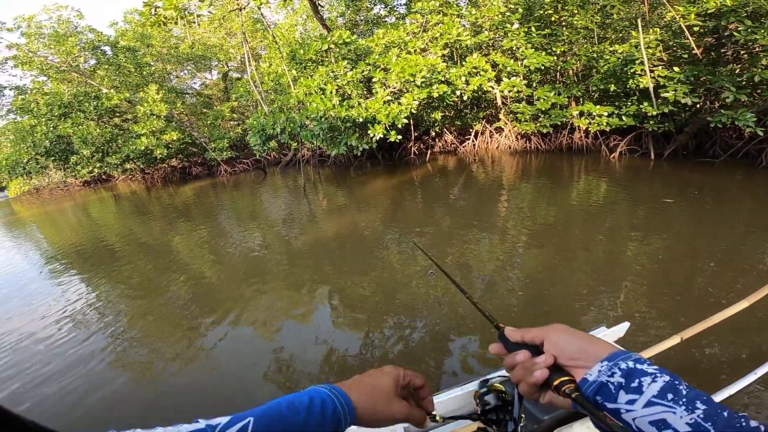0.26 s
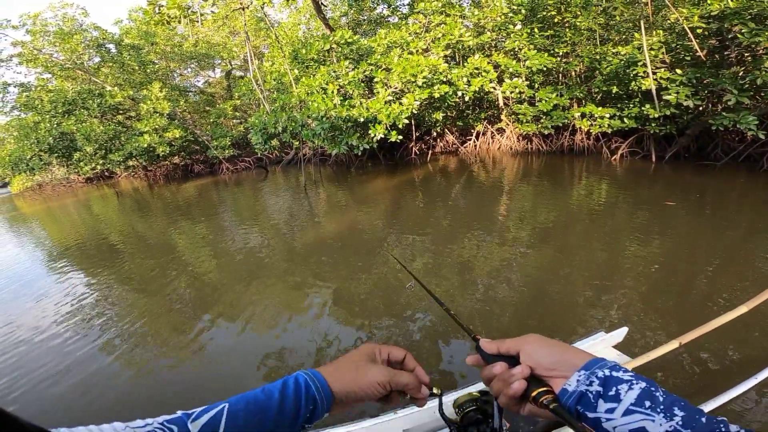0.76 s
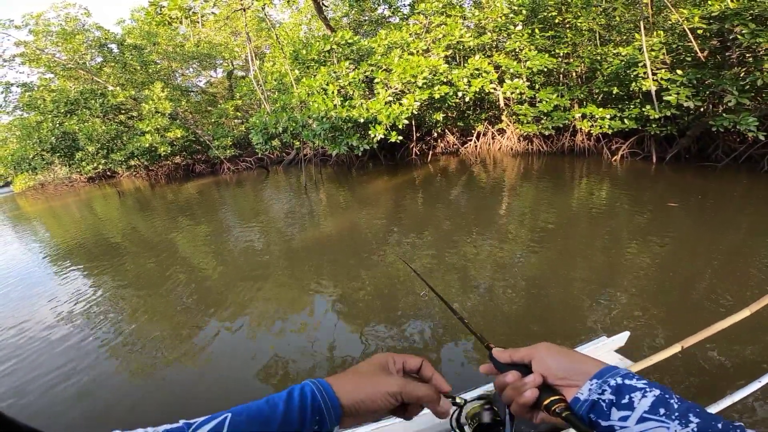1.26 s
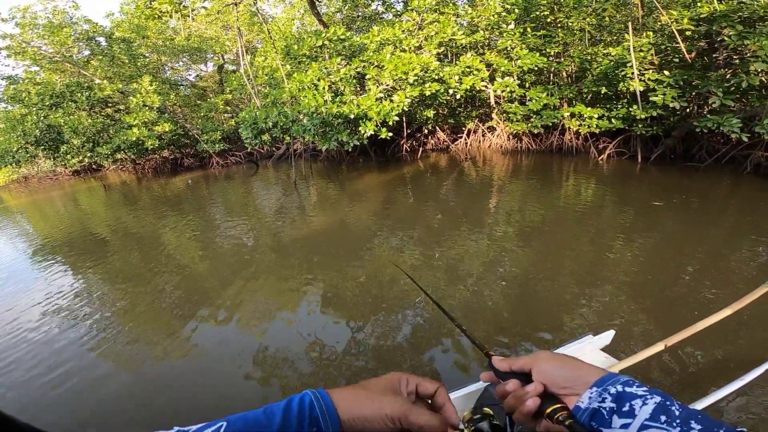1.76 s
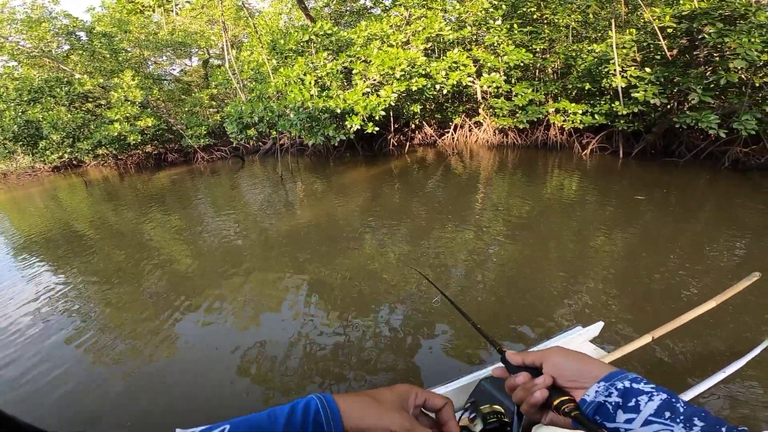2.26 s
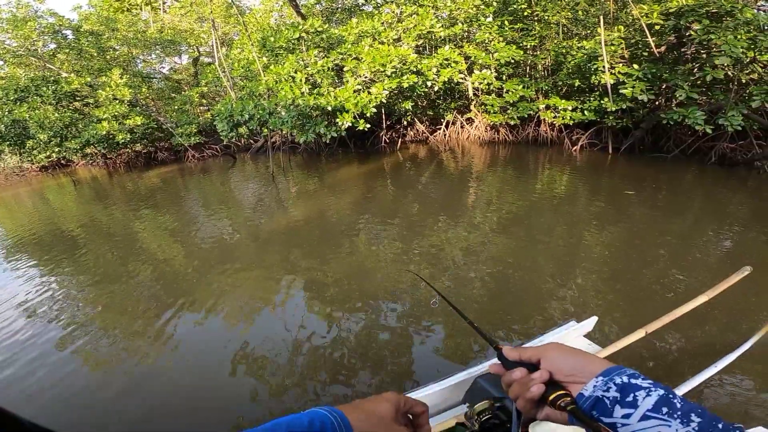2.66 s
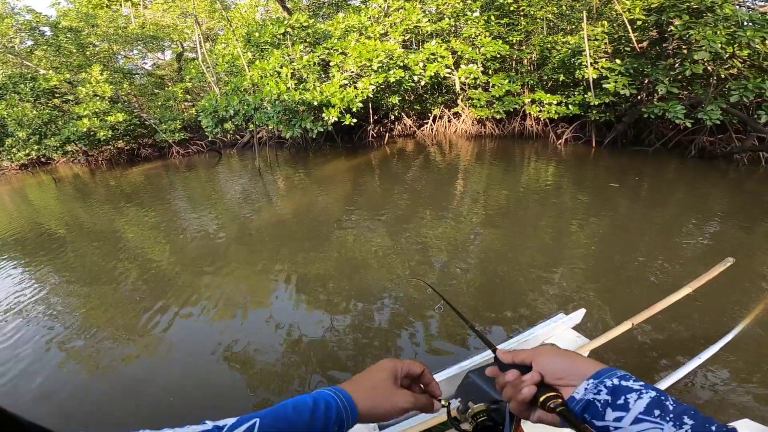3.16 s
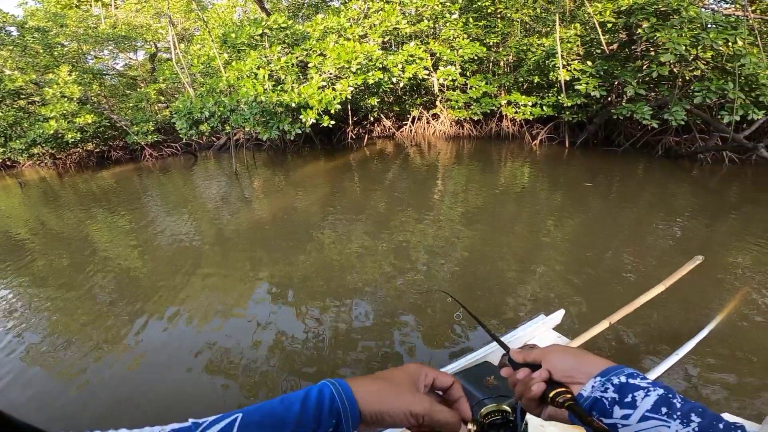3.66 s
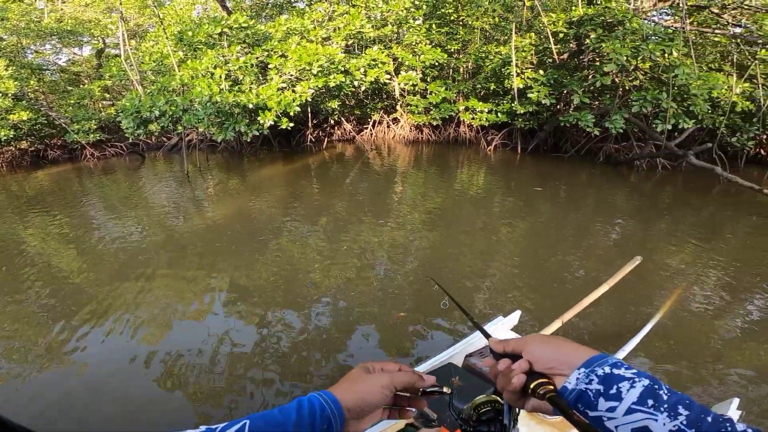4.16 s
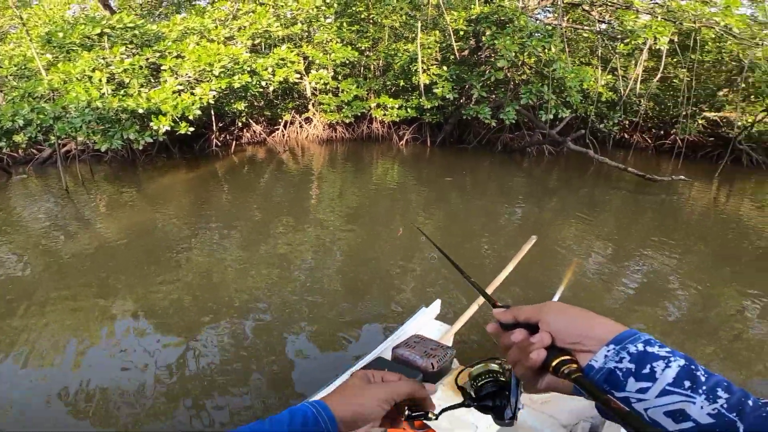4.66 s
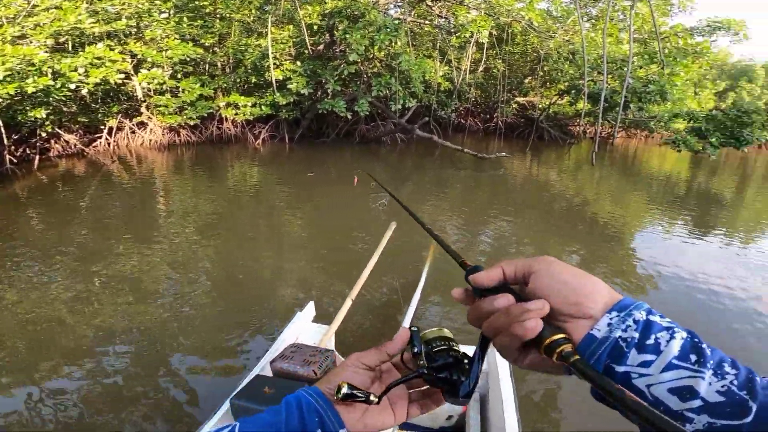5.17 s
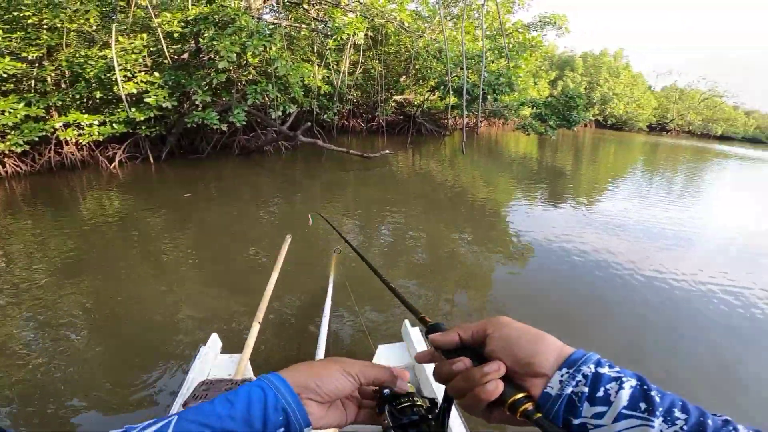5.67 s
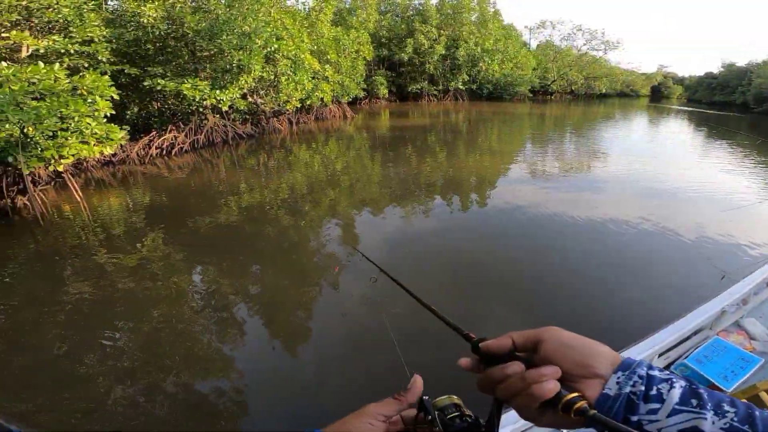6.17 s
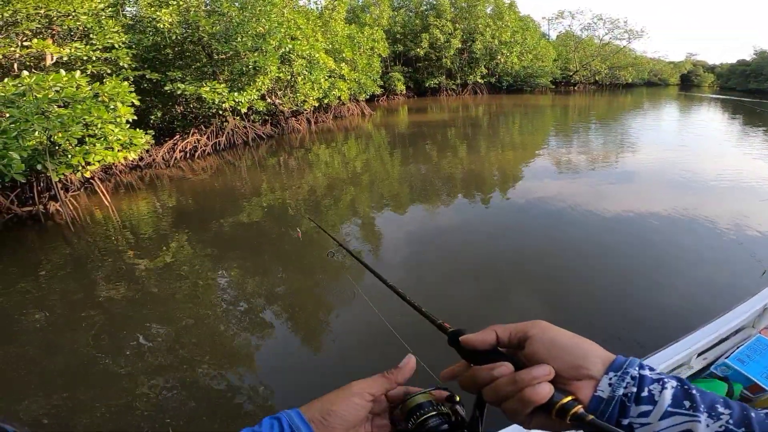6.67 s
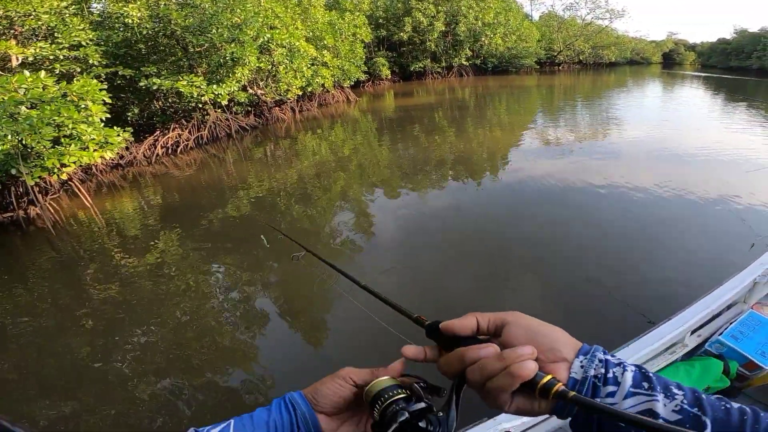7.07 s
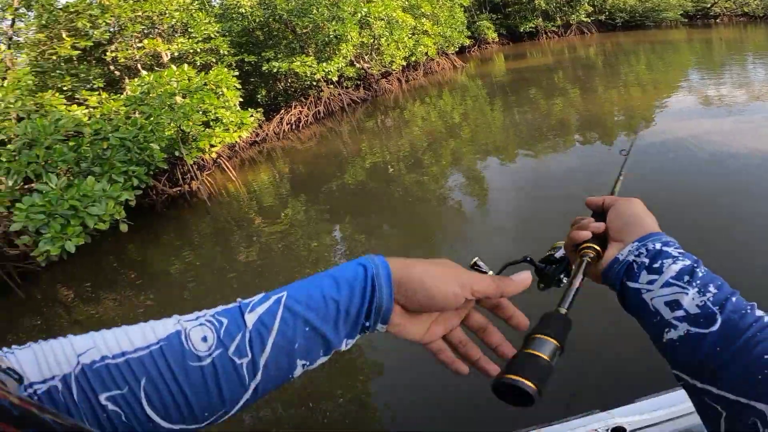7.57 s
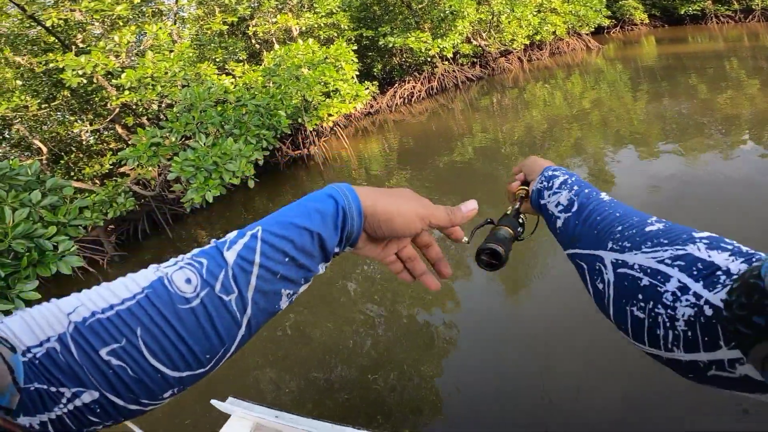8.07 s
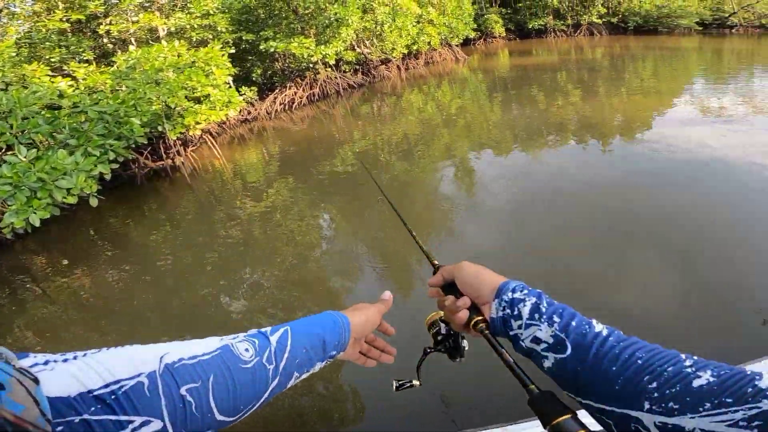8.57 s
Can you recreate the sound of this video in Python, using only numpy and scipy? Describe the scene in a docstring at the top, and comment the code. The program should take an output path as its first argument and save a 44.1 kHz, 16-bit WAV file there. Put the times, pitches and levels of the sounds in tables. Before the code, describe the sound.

A steady cicada hiss throbs in mangroves, then a near cicada pulses loudly, while fishing reel clicks, hull knocks and water laps sound close by.

```python
"""Cicadas around a small boat

A far cicada chorus throbs in the mangroves, then a near cicada chirps loudly: tymbal snaps ring coloured
bodies. Fainter insects are bands of noise; a distant bird whistles steady, quavering tones through the echoing
trees. An angler's reel clicks and whirrs, gear strikes ring the modes of rod and hull, and friction hisses and
squeaks. Shaped noise makes lapping water, leaf hiss, rumble, a murmur and breeze at the microphone; sines make
a low drone."""
import sys
import numpy as np
from scipy import signal
from scipy.fft import rfft, irfft, next_fast_len
from scipy.io import wavfile
from scipy.ndimage import uniform_filter1d

SR = 44100
rng = np.random.default_rng(int(sys.argv[2]) if len(sys.argv) > 2 else 0)


def output_pcm(signal):
    """Save a mono or channel-first signal as 16-bit PCM at the path in sys.argv[1].

    Samples are clipped to [-1, 1] before scaling.
    """
    pcm = np.clip(np.atleast_2d(signal).T, -1, 1) * 32767
    wavfile.write(sys.argv[1], SR, np.round(pcm).astype(np.int16))


N = 389403
TIME = np.arange(N) / SR

# lead of the left microphone port over the right; negative means that the right leads
CHORUS_LEAD_US, CICADA_LEAD_US, GEAR_LEAD_US, LEAVES_LEAD_US = -38.5, 29, 45, 28.3


def from_db(db):
    """Logarithmic level: 20 dB is a factor of ten in amplitude."""
    return 10 ** (np.asarray(db) / 20)


def rms_one(x):
    """Normalisation: scale to unit mean power."""
    return x / np.sqrt(np.mean(x ** 2) + 1e-20)


def in_time(rows):
    """Linear interpolation: each column of a curve at every sample."""
    s, *columns = np.transpose(rows)
    return [np.interp(TIME, s, c) for c in columns]


def drift(rate):
    """Low-pass random process: white noise through two equal poles wanders smoothly with spread 1."""
    r = np.exp(-80 * np.pi * rate / SR)
    # computed at every 40th sample; the first 2000 values let the filter settle
    white = rng.standard_normal(N // 40 + 2002)
    slow = signal.lfilter([1], [1, -2 * r, r * r], white)[2000:]
    return np.interp(np.arange(N) / 40, np.arange(len(slow)), rms_one(slow))


def stereo_noise(alike):
    """Interchannel coherence: mid and side white noise mix to a given left-right correlation."""
    mid, side = rng.standard_normal((2, N))
    alike = np.clip(alike, -1, 1)
    common = np.sqrt(1 + alike) * mid
    opposed = np.sqrt(1 - alike) * side * [[1], [-1]]
    return (common + opposed) / np.sqrt(2)


def colour(x, points):
    """Minimum-phase filtering: a causal response follows a spectrum and falls beyond its ends; unit power."""
    size = 2 * next_fast_len(N // 2 + 4096)
    octave = np.log2(np.maximum(np.arange(size // 2 + 1) * SR / size, 1))
    hz, db = np.transpose(points)
    beyond = np.abs(octave - np.clip(octave, np.log2(hz[0]), np.log2(hz[-1])))
    # 18 dB per octave outside the listed range, for at most two octaves
    gain_db = np.interp(octave, np.log2(hz), db) - 18 * np.minimum(beyond, 2)
    # folding the cepstrum onto positive times makes the filter causal
    cepstrum = irfft(np.log(from_db(gain_db)))
    cepstrum[1:size // 2] *= 2
    cepstrum[size // 2 + 1:] = 0
    response = np.exp(rfft(cepstrum))
    return rms_one(irfft(rfft(x, size) * response)[..., :N])


def band(x, low_hz, high_hz, order=2):
    """Butterworth band-pass: a maximally flat pass band."""
    edges = [low_hz, min(high_hz, SR / 2 - 1)]
    return signal.sosfilt(signal.butter(order, edges, "band", fs=SR, output="sos"), x)


def add(out, s, sound):
    """Superposition: mix a short sound in at a time."""
    start = int(s * SR)
    out[:, start:start + sound.shape[-1]] += sound[..., :N - start]


def scatter(x, t60):
    """Diffuse scattering: countless small decaying echoes, different for each side."""
    t = TIME[:SR // 2]
    echoes = rng.standard_normal((2, len(t))) * from_db(-60 * t / t60)
    echoes /= np.sqrt(np.sum(echoes ** 2, axis=1, keepdims=True))
    return signal.fftconvolve(np.atleast_2d(x), echoes, axes=1)[:, :N]


def ports(x, lead_us):
    """Interaural-like delay: one microphone port leads; the phase gap stops growing above 6800 Hz."""
    size = next_fast_len(N + 64)
    hz = np.minimum(np.arange(size // 2 + 1) * SR / size, 6800)
    turn = np.pi * hz * lead_us / 1e6   # each side takes half of the lead
    return irfft(rfft(x, size) * np.exp(1j * turn * np.array([[1], [-1]])), size)[:, :N]


def stroke(start, length, attack_s, t60):
    """Envelope of one movement: it rises up to its start, holds for its length and decays exponentially."""
    attack = np.clip((TIME - start) / attack_s + 1, 0, 1)
    return attack * from_db(-60 * np.clip((TIME - start - length) / t60, 0, 2))


def blurred_tone(hz, width_hz):
    """Narrow-band noise: slow random quadrature amplitudes shake a carrier's strength and phase; unit power."""
    smooth = signal.butter(2, np.clip(width_hz, 5, 2000), fs=SR, output="sos")
    a, b = signal.sosfilt(smooth, rng.standard_normal((2, len(hz) + SR // 10)))[:, SR // 10:]
    phase = 2 * np.pi * np.cumsum(hz) / SR
    return rms_one(a * np.cos(phase) + b * np.sin(phase))


# two tymbals each buckle in and spring out once a cycle: cycle_share (0 to 1), level_db
TYMBAL = [(.02, 0), (.21, -.5), (.58, .3), (.77, 0)]


def tymbal_clicks(rate_hz, wander, uneven_db):
    """Snap-through buckling: four impulses to a muscle cycle, each with a strength of its own."""
    cycles = np.cumsum(rate_hz * (1 + wander * drift(8))) / SR
    clicks = np.zeros(N)
    for share, db in TYMBAL:
        clicks += np.diff(np.floor(cycles - share), prepend=-1) * from_db(db)
    return clicks * from_db(uneven_db * rng.standard_normal(N))


def rib_rattle(clicks, ring_s, alike):
    """Impulsive excitation: each snap sets off a short decaying crackle, as of a tymbal's ribs; unit power."""
    r = np.exp(-1 / (ring_s * SR))
    envelope = signal.lfilter([1], [1, -r], clicks + 1e-18)
    return rms_one(envelope * stereo_noise(alike))


# level and balance of the far chorus: time_s, level_db, left_over_right_db
CHORUS = [(0, -45.5, -3.5), (3.3, -46.5, -3.5), (4.6, -44.5, -2.5), (5.2, -45, 0.5), (5.68, -43.5, 1),
          (5.85, -50, 0.5), (6.1, -52, 2), (6.3, -45, 2), (8.83, -41.5, 3)]
# peak swing of the throb about the level; a negative one swaps peaks and dips: time_s, depth_db
THROB = [(0, 1.8), (1.7, 1.1), (3.2, .5), (4.6, 2), (6.3, 0.8), (8.83, -2.5)]
# cicada body resonances heard from afar: frequency_hz, relative_density_db_per_hz
FAR_BODY = [(4000, -49), (4750, -22), (5250, -5.5), (5750, -5), (6200, 1), (6500, -2.5), (6900, -9),
            (7700, -13.5), (8100, -21), (9200, -27.5), (10500, -38.5), (12200, -25.5), (13200, -57)]
THROB_HZ, FIRST_THROB_S = 8.4, .067


def far_chorus():
    """Amplitude modulation: distance smears most snaps into a hiss that throbs about eight times a second."""
    level_db, pan_db = in_time(CHORUS)
    (depth_db,) = in_time(THROB)
    clicks = tymbal_clicks(107, wander=.015, uneven_db=3)
    snaps = rib_rattle(clicks, ring_s=.0006, alike=.5)
    song = colour(stereo_noise(alike=0.33) + .5 * snaps, FAR_BODY)
    throb_db = depth_db * np.cos(2 * np.pi * THROB_HZ * (TIME - FIRST_THROB_S)) + 0.14 * drift(28)
    return ports(song, CHORUS_LEAD_US) * from_db(level_db + throb_db + pan_db * [[.5], [-.5]])


# level of a thin insect trill, before its waver: time_s, level_db
TRILL = [(0, -67), (1, -69), (2.3, -66), (3.5, -70), (4.5, -78), (5.5, -82.5), (8.83, -86)]
TRILL_HZ, TRILL_WIDTH_HZ = 2564, 480
# level of the high hiss of small insects in the leaves: time_s, level_db
SIZZLE = [(0, -71.5), (4, -74), (5.3, -64), (5.9, -70.5), (6.3, -62.5), (7.6, -61.5), (8.3, -56.5),
          (8.83, -54.5)]
# spectrum of that hiss: frequency_hz, relative_density_db_per_hz
SIZZLE_COLOUR = [(7000, -19), (8500, 7.5), (10500, -1), (12200, 7), (13200, -4.5)]


def small_insects():
    """Spectral niches: fainter insects hold a narrow noise band below the cicadas and a hiss reaching above."""
    (trill_db,), (sizzle_db,) = in_time(TRILL), in_time(SIZZLE)
    low_hz, high_hz = TRILL_HZ - TRILL_WIDTH_HZ / 2, TRILL_HZ + TRILL_WIDTH_HZ / 2
    trill = rms_one(band(stereo_noise(alike=0.48), low_hz, high_hz))
    waver_db = 2.5 * drift(10)
    trill = ports(trill, LEAVES_LEAD_US) * from_db(trill_db + waver_db)
    sizzle = colour(stereo_noise(alike=-0.061), SIZZLE_COLOUR) * from_db(sizzle_db)
    return trill + sizzle


# spectrum of the low rumble: frequency_hz, relative_density_db_per_hz
RUMBLE = [(15, -7.5), (32, 5), (55, 4.5), (85, 4), (140, -3.5), (200, -8.5), (280, -17), (450, -31.5),
          (900, -52)]
# level of the low rumble, before its drift: time_s, level_db
RUMBLE_LEVEL = [(0, -46.5), (1.2, -46), (2.2, -48), (3.3, -45), (4.4, -47), (5.35, -44), (5.85, -52.5),
                (6.15, -52), (6.4, -45.5), (8.83, -47.5)]
# spectrum of the leaf hiss: frequency_hz, relative_density_db_per_hz
LEAVES = [(200, 8.5), (500, 0), (900, -3.5), (1700, 0), (2800, -4), (4200, -1.5), (8000, -10), (13000, -42)]
# level of the leaf hiss, before its drift: time_s, level_db
LEAF_LEVEL = [(0, -64.5), (3.6, -62.5), (4.4, -70), (4.6, -65), (5.1, -63), (5.9, -70.5), (7.1, -64.5),
              (7.35, -58.5), (8.1, -63.5), (8.3, -58), (8.5, -64), (8.83, -65)]
# peak amplitude of the drone's lower tone at each port, 3 dB below that heard: time_s, level_db
DRONE = [(0, -38.5), (.5, -50), (1.3, -41.5), (2.6, -43), (4.4, -57.5), (8.83, -57.5)]
DRONE_HZ, HUM_HZ = 59.3, 100
HUM_DB = -53.5   # like the drone's, raised by 3 dB in the sum


def open_air():
    """Broadband and tonal background: shaped noise rumbles and hisses under a wavering two-tone drone."""
    (rumble_db,), (leaves_db,), (drone_db,) = in_time(RUMBLE_LEVEL), in_time(LEAF_LEVEL), in_time(DRONE)
    rumble = colour(stereo_noise(alike=0.93), RUMBLE) * from_db(rumble_db + 1.8 * drift(5))
    rustle_db = .8 * drift(12)
    leaves = ports(colour(stereo_noise(alike=0.24), LEAVES), LEAVES_LEAD_US) * from_db(leaves_db + rustle_db)
    drone_phase = 2 * np.pi * np.cumsum(DRONE_HZ + .7 * drift(3)) / SR
    drone = np.sin(drone_phase) * from_db(drone_db + 1.5 * drift(4))
    hum_phase = 2 * np.pi * np.cumsum(HUM_HZ + .6 * drift(3)) / SR
    hum = np.sin(hum_phase) * from_db(HUM_DB + 1.2 * drift(3))
    return rumble + leaves + np.sqrt(2) * (drone + hum)   # root two turns peak into rms level


# level of a hollow low murmur, before its drift: time_s, level_db
MURMUR = [(0, -50), (2.8, -70.5), (3.4, -53), (4.5, -53), (5.4, -53), (5.8, -74), (8.83, -50)]


def murmur(low_hz=120, high_hz=190):
    """Band-limited noise: less than an octave of low noise sounds hollow as it swells and fades."""
    (level_db,) = in_time(MURMUR)
    hollow = rms_one(band(stereo_noise(alike=0.93), low_hz, high_hz))
    return hollow * from_db(level_db + 0.68 * drift(7.5))


# puffs of breeze on the left port, as bell curves: middle_s, level_db, standard_deviation_s
PUFFS = [(1.79, -26.5, 0.01), (1.966, -29, 0.011), (2.219, -18.5, 0.0085), (2.25, -23.5, 0.011),
         (2.5, -20, 0.0073), (2.545, -27, 0.01), (2.577, -21, 0.0096), (2.694, -33.5, 0.24),
         (2.92, -33, 0.022), (3.048, -33, 0.023), (3.343, -33, 0.044)]


def breeze(right_db=-14):
    """Turbulent pressure: eddies thump on the left port, weakly on the right; a slow flutter stays on both."""
    push = sum(from_db(db) * np.exp(-.5 * ((TIME - s) / length) ** 2) for s, db, length in PUFFS)
    eddy_colour = [(20, 6.0), (55, 14.5), (130, 0.5), (220, -13.0), (400, -42.5)]
    eddies = colour(stereo_noise(alike=0.17), eddy_colour)
    # the push alone sets a puff's strength
    eddies /= np.sqrt(uniform_filter1d(eddies ** 2, size=SR // 40) + 1e-9)
    flutter = colour(stereo_noise(alike=0.08), [(12, -13.0), (28, 7.0), (60, -16)])
    flutter *= from_db(-68.0 + 4.9 * drift(1.6))
    return eddies * push * from_db([[0], [right_db]]) + flutter


# spells of turning the reel: start_s, length_s, gear_whirr_db, line_swish_db
TURNS = [(0, .14, -61, -65), (0.436, 0.14, -82, -53.5), (3.915, 0.17, -58.5, -61.5),
         (4.19, 0.011, -53, -70)]
# resonances of the reel's gears and housing: frequency_hz, relative_density_db_per_hz
GEAR_COLOUR = [(800, -7), (1000, 4), (1200, -3.5), (1500, 6.5), (1650, 0), (1800, 10), (2200, -3),
               (2560, 11.5), (3200, -6.5), (4500, 2)]
# spectrum of line running onto the spool: frequency_hz, relative_density_db_per_hz
LINE_COLOUR = [(1500, -14.5), (2400, -3), (3100, 2), (3800, 1), (4800, -9)]
TURN_ATTACK_S, TURN_T60_S = 0.021, 0.48


def winding():
    """Resonant filtering of friction: gears whirr in the reel's housing and line swishes onto the spool."""
    gear, line = np.zeros((2, N))
    for s, length, gear_db, line_db in TURNS:
        turn = stroke(s, length, TURN_ATTACK_S, TURN_T60_S)
        gear += from_db(gear_db) * turn
        line += from_db(line_db) * turn
    whirr = colour(stereo_noise(alike=0.75), GEAR_COLOUR) * gear * from_db(2 * drift(60))
    swish = colour(stereo_noise(alike=0.99), LINE_COLOUR) * line * from_db(1.3 * drift(51))
    return whirr + swish


# ripples reach the hull: crest_s, level_db (before its drift)
LAPS = [(0.1, -69), (1.05, -58), (3.25, -56.5), (4.4, -60.5), (5.35, -54.5), (6.37, -51.5), (7.3, -61.5),
        (8.35, -52), (8.75, -48.5)]
# spectrum of the slop: frequency_hz, relative_density_db_per_hz
LAP_COLOUR = [(130, -9.5), (230, -0.5), (380, -2), (500, -7.5), (700, -22.5), (1200, -22.5)]
LAP_RISE_DB_PER_S, LAP_FALL_DB_PER_S = 56.5, 40


def water():
    """Exponential growth and decay: ripples slop on the hull, swell quickly and drain more slowly."""
    slop = np.zeros(N)
    for crest_s, db in LAPS:
        below_db = np.maximum(LAP_RISE_DB_PER_S * (crest_s - TIME), LAP_FALL_DB_PER_S * (TIME - crest_s))
        slop += from_db(db - below_db)
    return colour(stereo_noise(alike=0.88), LAP_COLOUR) * slop * from_db(2.0 * drift(17))


def strike(blows, body, crack_db, rattle, echo_db):
    """Modal excitation: a push and brief rattle ring a body's modes; blows on stiff parts leave low ones still."""
    out, t = np.zeros((2, N)), TIME[:SR // 3]
    hz, mode_db, t60 = np.transpose(body)[:, :, None]
    for s, db, lowest_hz, bright_db, contact_t60 in blows:
        tilt_db = bright_db * np.log2(hz / 600)
        strength = from_db(mode_db + tilt_db + rng.normal(0, 1, hz.shape))
        strength /= np.sqrt(1 + (lowest_hz / hz) ** 20)
        strength *= rng.choice([-1, 1], hz.shape)
        modes = np.sum(strength * np.sin(2 * np.pi * hz * t) * from_db(-60 * t / t60), axis=0)
        dying = from_db(-60 * t / contact_t60)
        # one push, then sparse random contacts
        force = rattle * rng.standard_normal(len(t)) * (rng.random(len(t)) < .2) * dying
        force[0] = 1
        ring = signal.fftconvolve(force, modes)[:len(t)]
        ring /= np.std(ring[:SR // 50])   # unit level over the first 20 ms
        crack = rms_one(band(rng.standard_normal(len(t)), lowest_hz, 750, order=1))
        crack *= from_db(crack_db) * dying
        add(out, s, from_db(db - 3.5) * band(ring + crack, lowest_hz * 0.84, 5600, order=3))
    return out + from_db(echo_db) * scatter(band(out, 590, 5900), t60=0.32)


# knocks on the hull, t60 being that of the rattling contact:
# start_s, level_db (3.5 above the ring's), lowest_ringing_hz, brightness_db_per_octave, contact_t60_s
KNOCKS = [(.188, -53, 280, -9, 0.055), (7.649, -28.5, 151, -3.5, 0.14), (7.793, -26.5, 150, -0.5, 0.12),
          (7.995, -43.5, 260, -3.5, 0.2), (8.351, -43.5, 404, -13, 0.04), (8.569, -43.5, 524, -20, 0.04),
          (8.727, -25.5, 159, 1.5, 0.078), (8.738, -36.5, 171, -2, 0.047)]
# hull modes: frequency_hz, relative_level_db, t60_s
HULL = [(166, -16, .12), (207, -3.5, 0.2), (300.2, 6.5, 0.14), (330, 2, .13), (406, -1.5, 0.12),
        (450, -6, 0.042), (491, 2.5, 0.05), (583, -3, 0.059), (750, 0.5, 0.04), (850, -3, 0.027),
        (943, -4.5, 0.086), (1033, 1, 0.062), (1250, -11, 0.061), (1480, -15, .035), (2230, 0, .018),
        (2980, -7, .039), (3830, -0.5, 0.0048)]
# bumps of the rod and reel, with the same columns as the knocks:
# start_s, level_db (3.5 above the ring's), lowest_ringing_hz, brightness_db_per_octave, contact_t60_s
BUMPS = [(1.082, -38.5, 196, 0.5, .1), (1.996, -31.5, 590, -6, 0.041), (2.008, -43, 650, 0, 0.049),
         (2.04, -47.5, 600, -10, 0.082), (4.566, -46.5, 700, -6, 0.034), (4.581, -40.5, 160, 3.5, 0.058),
         (4.593, -37, 161, 3, .03), (4.598, -42.5, 300, 5.5, 0.06), (5.12, -44, 150, -9, 0.27),
         (5.152, -44.5, 149, -7, 0.2), (5.361, -37, 154, 2, 0.097), (7.396, -53, 536, -10, .054)]
# rod and reel frame modes: frequency_hz, relative_level_db, t60_s
ROD = [(174, 1.5, 0.2), (232, 0, 0.19), (306, -1, 0.062), (627, -4.5, 0.059), (710, -5.5, 0.049),
       (990, -7, 0.023), (1150, 0.5, 0.019), (1310, -9, 0.035), (1385, -4, 0.052), (1464, -3.5, 0.05),
       (1610, -5, 0.034), (2050, -6.5, 0.021), (2950, -9, .013), (3740, -20, .008)]


def knocks():
    """Modes of two bodies: hollow knocks on the hull and harder, brighter bumps of the rod."""
    hull = strike(KNOCKS, HULL, crack_db=-5, rattle=0.11, echo_db=-13)
    rod = strike(BUMPS, ROD, crack_db=-1.0, rattle=0.22, echo_db=-7.0)
    return hull + rod


# reel and rod clicks:
# start_s, level_db (2 above the direct sound's), centre_hz, t60_s, ring_over_crack_db, left_over_right_db
CLICKS = [(0.23, -50.5, 2000, 0.053, -2, -2), (.621, -53.5, 2070, .035, 3, 0),
          (1.083, -37.5, 3260, 0.049, -0.5, -3), (1.935, -43, 4500, 0.021, 10, 4),
          (1.937, -46.5, 3180, 0.045, 3, 4), (2.131, -56.5, 2580, .05, 7, -6),
          (2.404, -50, 2230, 0.052, -2, -3), (2.453, -52.5, 1344, 0.087, 0, -1),
          (2.795, -42, 3550, 0.091, -1.5, -5), (2.796, -60, 1025, 0.18, 6, -4),
          (2.91, -52, 3280, 0.086, -3, -6), (3.043, -43.5, 3980, 0.077, 4.5, -4),
          (3.21, -47.5, 4190, 0.053, -12, -4), (3.389, -47, 4850, 0.093, -1, -4),
          (3.617, -52.5, 1970, 0.15, -8, -4), (4.501, -51.5, 1510, .03, 6, 2),
          (4.506, -52, 2100, 0.031, 6, 2), (4.513, -48, 1490, 0.057, 3.5, 1),
          (4.524, -48, 2290, .03, -9, 4), (4.613, -53, 1450, .035, 0, 0), (4.624, -57, 2170, 0.08, 8, 0),
          (4.641, -54, 1500, 0.045, 3.5, 0), (4.783, -56, 1990, 0.054, -15, 0),
          (6.031, -36.5, 3530, 0.043, -1.5, -4), (6.03, -39, 8880, 0.029, 4.5, 6),
          (6.076, -51, 3280, 0.18, -12, -2), (6.819, -46, 2620, 0.013, 2, -2),
          (7.288, -56.5, 2620, 0.045, 12, -2), (7.3935, -25, 2730, 0.026, -2.5, -1),
          (7.3954, -18.5, 4070, 0.011, -16, 0), (8.242, -51.5, 3620, 0.039, 6.5, -7),
          (8.324, -43.5, 3620, 0.12, -12, -2), (8.36, -43, 3400, 0.073, -21, -2)]


def reel(spread=2.2, ring_width_hz=130, housing_db=-14, echo_db=-18):
    """Impact and resonance: hard parts crack, ring roughly at the part's own pitch, and the housing answers."""
    out, t = np.zeros((2, N)), TIME[:SR // 5]
    noise = band(stereo_noise(alike=0.98), 670, 6100)
    contact = np.minimum(t / .001, 1)   # the force builds up in 1 ms
    for s, db, hz, t60, ring_db, pan_db in CLICKS:
        piece = noise[:, int(s * SR):][:, :len(t)]
        crack = rms_one(band(piece, hz / spread, hz * spread, order=1))
        ring = from_db(ring_db) * blurred_tone(np.full(len(t), hz), ring_width_hz)
        decay = from_db(db - 60 * t / t60 + pan_db * np.array([[.5], [-.5]]))
        add(out, s, (crack + ring) * contact * decay)
    housing = from_db(housing_db) * np.std(out) * colour(out, GEAR_COLOUR)
    return from_db(-2.0) * (out + housing) + from_db(echo_db) * scatter(out, t60=0.12)


# sleeve and fingers rub on the rod: start_s, length_s, level_db (before its drift)
RUBS = [(1.107, 0.028, -55), (1.94, 0.045, -51.5), (4.505, 0.15, -54), (4.764, 0.048, -60),
        (5.114, 0.12, -64), (5.362, 0.019, -56.5), (8.234, 0.071, -57.5), (8.672, 0.027, -56)]
# spectrum of the rubbing: frequency_hz, relative_density_db_per_hz
RUB_COLOUR = [(300, 2.5), (700, -1.5), (1400, 3.5), (2500, 4), (4500, 3), (9000, -8)]
RUB_ATTACK_S, RUB_T60_S = 0.018, 0.98
CRACKLES_PER_S, CRACKLE_DB = 110, -2   # mean rate; level against the hiss


def handling():
    """Stick-slip friction: cloth and fingers hiss on the rod and crackle where they catch and let go."""
    pressure = sum(from_db(db) * stroke(s, length, RUB_ATTACK_S, RUB_T60_S) for s, length, db in RUBS)
    catches = rng.random(N) < CRACKLES_PER_S / SR
    catches = catches * from_db(4 * np.minimum(rng.exponential(1, N), 3))
    crackle = rib_rattle(catches, ring_s=.001, alike=.8)
    friction = stereo_noise(alike=0.7) + from_db(CRACKLE_DB) * crackle
    return colour(friction, RUB_COLOUR) * pressure * from_db(1.4 * drift(27))


# reel parts and fingers slide with a pitch:
# start_s, length_s, start_pitch_hz, end_pitch_hz, level_db (before the fades), width_hz
SQUEAKS = [(3.994, .13, 1880, 1720, -64, 45), (4.17, 0.094, 1027, 996, -60.5, 45),
           (4.174, 0.07, 1800, 1730, -66, 70), (5.17, 0.1, 4500, 4520, -58, 200)]


def squeaks(echo_db=-10):
    """Friction-driven oscillation: sliding parts sing faintly; the pitch glides with their speed."""
    out = np.zeros((1, N))
    for s, length, start_hz, end_hz, db, width_hz in SQUEAKS:
        size = int(length * SR)
        tone = blurred_tone(np.geomspace(start_hz, end_hz, size), width_hz)
        add(out, s, from_db(db) * tone * signal.windows.tukey(size))
    return out + from_db(echo_db) * scatter(out, t60=.25)


# near cicada's body resonances: frequency_hz, relative_density_db_per_hz
NEAR_BODY = [(4000, -62.5), (4750, -19), (5120, -7), (5450, -11), (5610, 3), (5760, 1), (5930, -4),
             (6050, 2.5), (6130, 4.5), (6230, 8.5), (6400, 0.5), (6550, -12.5), (6680, 1), (6780, -6.5),
             (6930, -14.5), (7350, -7.5), (7650, -13), (7830, -8.5), (8150, -20), (8520, -17.5),
             (10500, -38.5), (12200, -18), (13200, -47)]
TYMBAL_HZ = 106.6
# middle of the first chirp; each period is a little longer than the last
FIRST_CHIRP_S, CHIRP_PERIOD_S, SLOWING_S_PER_CHIRP = 5.991, .1144, .00022
# direct song: it starts softly, swells to full voice and slowly tires
START_DB, SWELL_DB_PER_S, FULL_DB, TIRING_DB_PER_S = -53, 56, -37.5, 0.67


def near_cicada(echo_db=-10, count=25):
    """Gated radiation: tymbals keep snapping while the abdomen opens for each chirp to let out full strength."""
    length_s, edge_s, closed = .056, .001, from_db(-14)
    k, singing_s = np.arange(count), TIME - FIRST_CHIRP_S
    middles = FIRST_CHIRP_S + CHIRP_PERIOD_S * k + SLOWING_S_PER_CHIRP * k ** 2 / 2
    opening = sum(np.clip((length_s / 2 - np.abs(TIME - s)) / edge_s + .5, 0, 1) for s in middles)
    swell_db = START_DB + SWELL_DB_PER_S * singing_s
    tiring_db = FULL_DB - TIRING_DB_PER_S * singing_s
    onset = np.clip(singing_s / length_s + 1, 0, 1)
    effort = from_db(np.minimum(swell_db, tiring_db)) * onset
    clicks = tymbal_clicks(TYMBAL_HZ, wander=.009, uneven_db=1.3)
    rattle = rib_rattle(clicks, ring_s=.0003, alike=0)
    snaps = colour(2.5 * rms_one(clicks) + rattle, NEAR_BODY)
    song = ports(snaps, CICADA_LEAD_US) * effort * (opening + closed * (1 - opening))
    return song + from_db(echo_db) * scatter(song, t60=0.04)


# whistled notes of a distant bird:
# start_s, length_s, mean_pitch_hz, level_db (before swells and the paths through the trees)
WHISTLES = [(7.2, .32, 3260, -69), (7.407, .19, 3570, -65), (7.598, .19, 3460, -63), (7.81, .21, 3410, -65),
            (8.22, .16, 3560, -62), (8.39, .27, 3425, -63.5)]


def bird(direct=0.65, echo_db=-0.5):
    """Reverberant propagation: thin, quavering tones swell and fade through the trees and linger there."""
    out = np.zeros((1, N))
    for s, length, hz, db in WHISTLES:
        size = int(length * SR)
        pitch_hz = hz * (1 + .008 * drift(75)[:size])
        swell_db = 5 * np.clip(drift(40)[:size], -3, .9)
        level = from_db(db + swell_db) * signal.windows.tukey(size, .3)
        add(out, s, np.sin(2 * np.pi * np.cumsum(pitch_hz) / SR) * level)
    return direct * out + from_db(echo_db) * scatter(out, t60=0.66)


def scene():
    """Superposition of sources: insects and a bird in the trees, the angler's gear, water and air."""
    trees = far_chorus() + small_insects() + near_cicada() + bird()
    angler = ports(winding() + knocks() + reel() + handling() + squeaks(), GEAR_LEAD_US)
    return trees + angler + water() + open_air() + murmur() + breeze()


CUTOFF_HZ = 13500


def record(dry):
    """Band limiting: an elliptic low-pass cuts the top steeply."""
    return signal.sosfilt(signal.ellip(10, .2, 80, CUTOFF_HZ, fs=SR, output="sos"), dry)


dry = scene()
out = record(dry)
output_pcm(out)
```